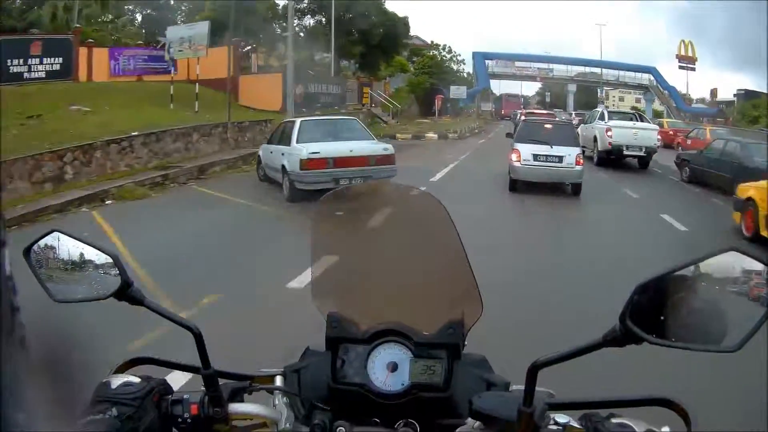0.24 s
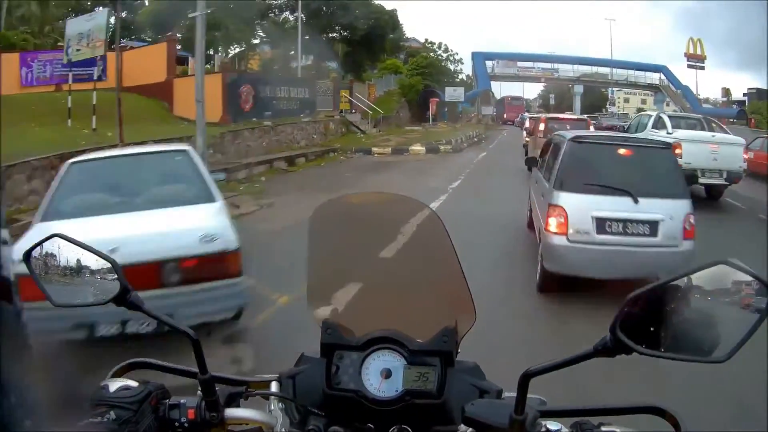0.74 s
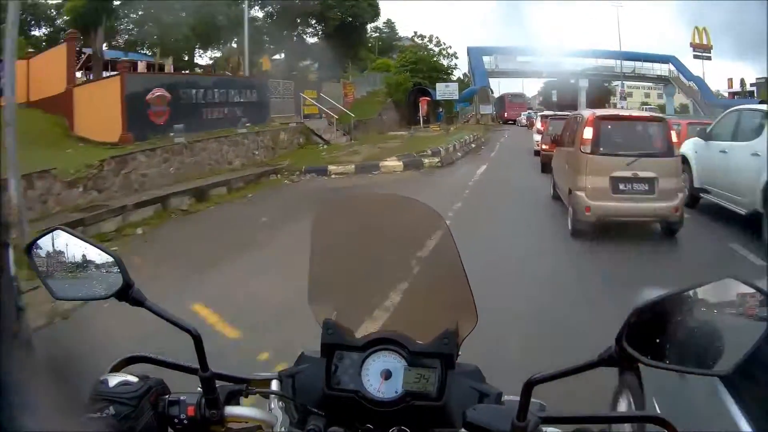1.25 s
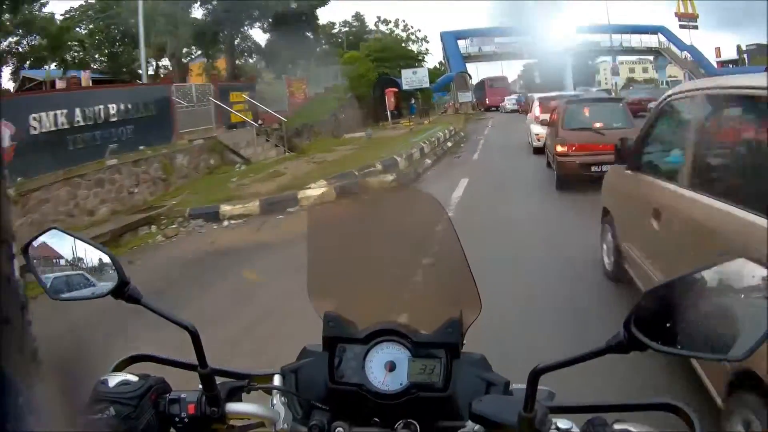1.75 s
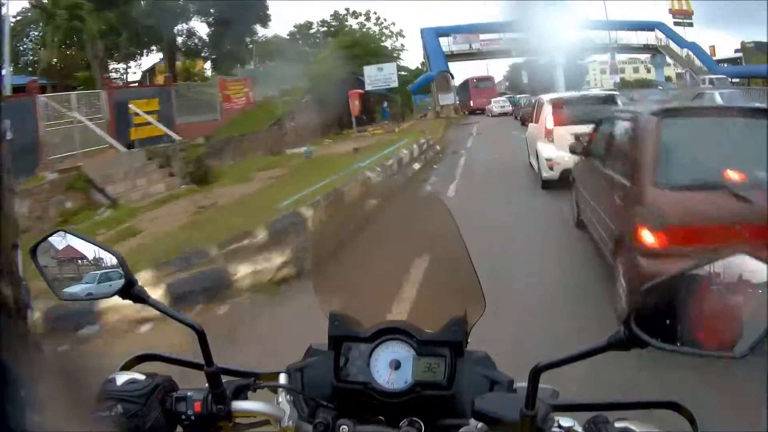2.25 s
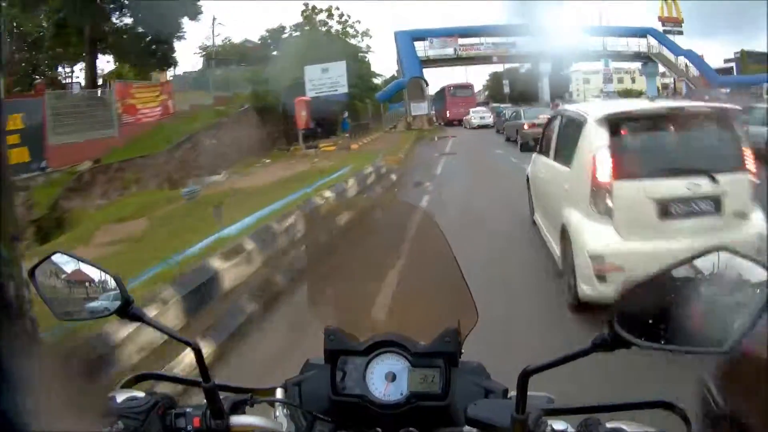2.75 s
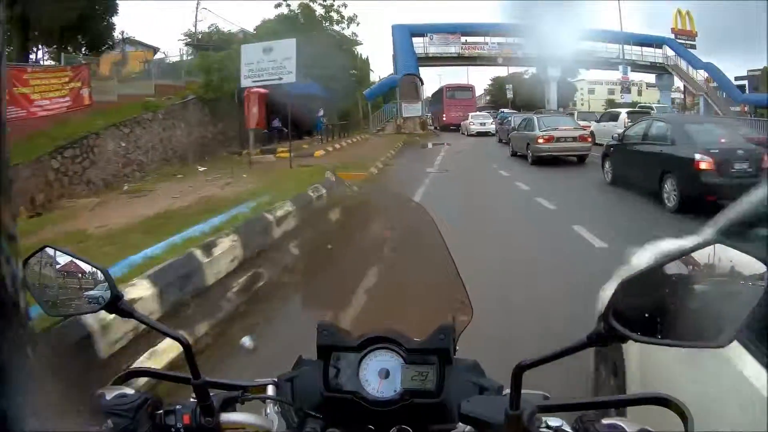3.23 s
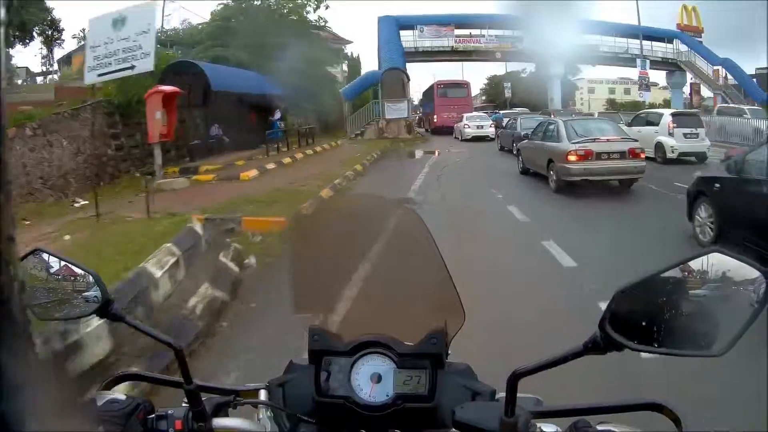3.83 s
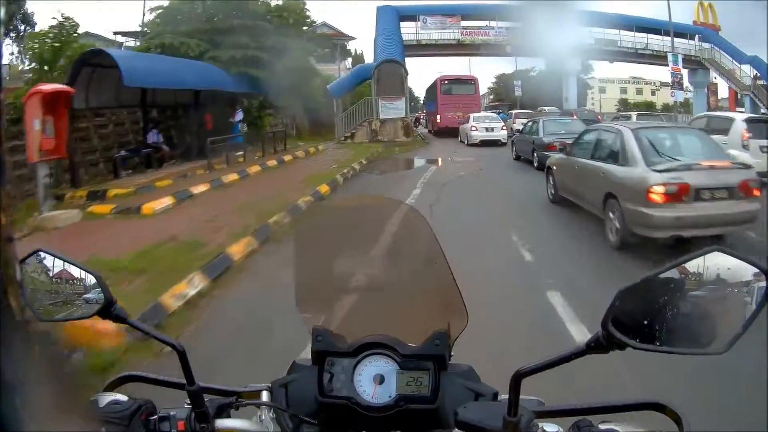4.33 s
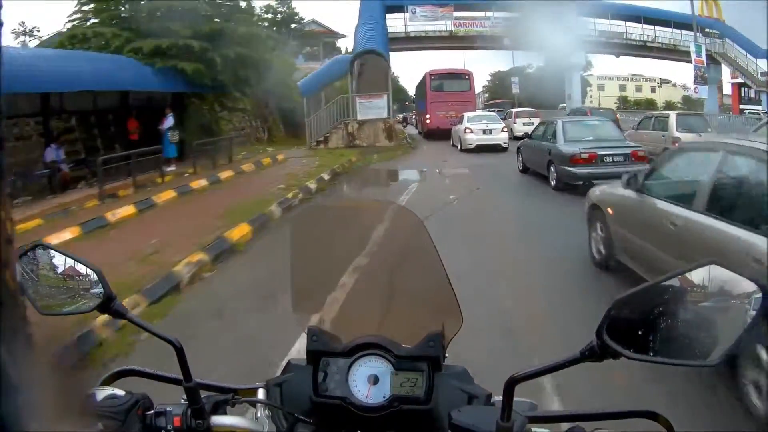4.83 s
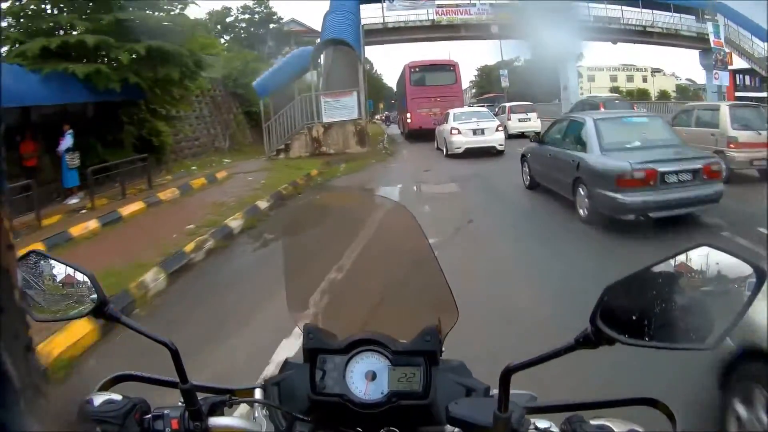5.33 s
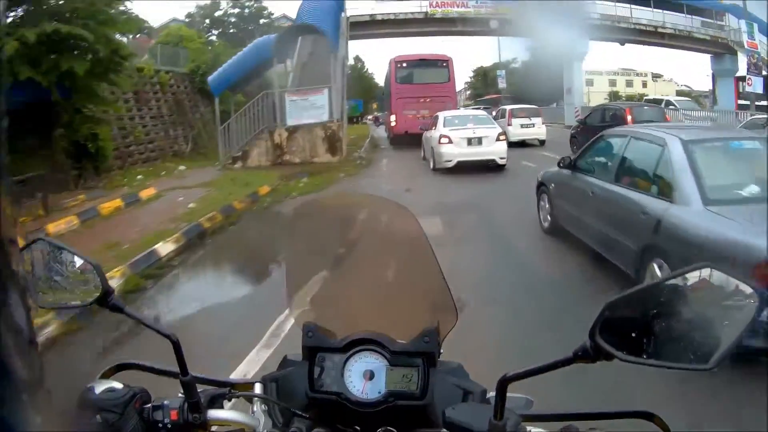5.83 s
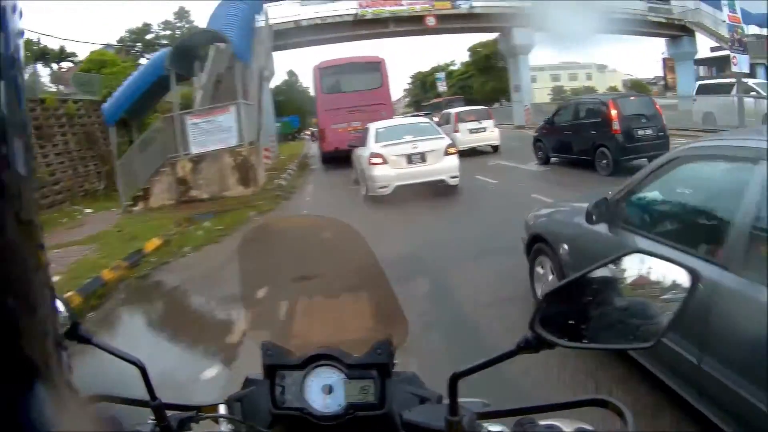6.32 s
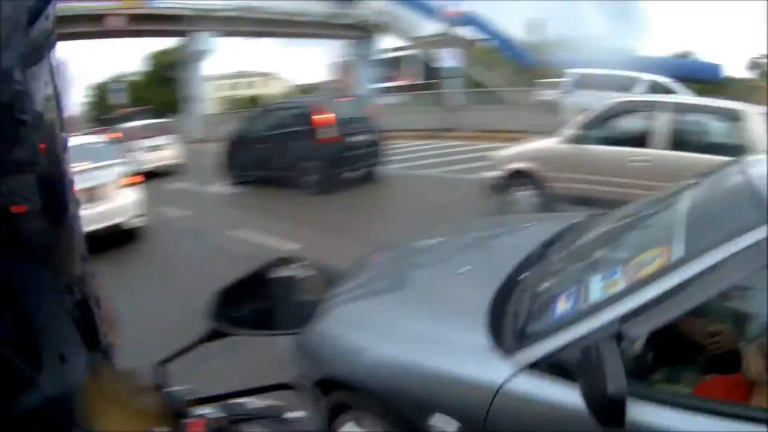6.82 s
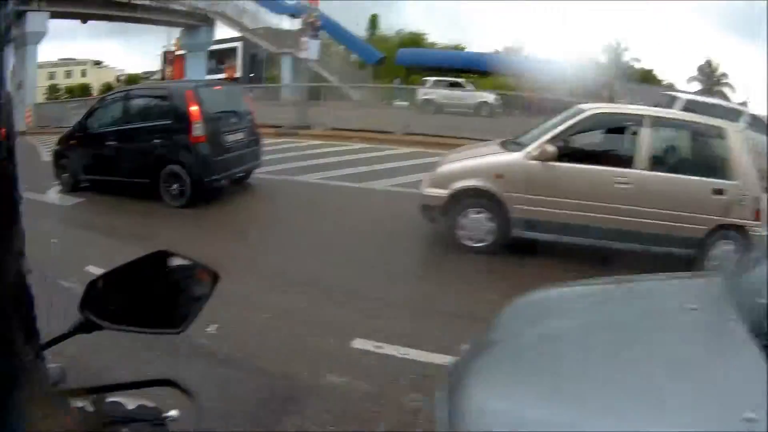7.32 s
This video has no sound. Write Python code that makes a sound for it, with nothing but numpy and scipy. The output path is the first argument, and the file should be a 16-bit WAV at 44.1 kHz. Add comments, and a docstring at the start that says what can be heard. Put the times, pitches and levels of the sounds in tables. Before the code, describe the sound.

A rider's microphone, enclosed in a small waterproof case, gives everything a hollow, boxy ring with muted treble. From 0 to about 1.7 s, strong low wind rumbles in irregular lumps with frequent gust slaps, over a twin-cylinder throb and hollow road roar. Sharp little drops tick on the case, clearest near 0.4, 0.9, 1.5 and 1.7 s. Wet tyre hiss swells briefly beside cars around 1.4, 2.1, 2.8 and 3.3 s. Wind eases; from 2.3 s a small engine nearby drones low and wavering, turning to a buzzing rasp with sharp pops at 4.4-4.9 s, then fading by 5.6 s. Another drop ticks at 5.2 s. The motorcycle's slow idle comes forward in paired thuds, stumbling weakly around 6-6.6 s. Light valve clatter rises near 6.6 s, small wet swishes pass, and dull knocks land at 6.95, 7.3 and 7.4 s.

```python
"""Motorcycle coasting on a wet road

A twin-cylinder motorcycle rolls beside queued cars and settles to a lumpy idle: paired pulses through a filter.
Wind, noise in irregular lumps, buffets the rider's camera and fades with speed; a small engine nearby drones
in low orders of its firing rate, then rasps in sharp pops. Grainy tyre hiss swells beside each car, damped
partials tick as drops hit the camera's waterproof case, and resonances give the air inside a hollow ring."""
import sys
import numpy as np
from scipy import signal
from scipy.fft import rfft, irfft, next_fast_len
from scipy.io import wavfile
from scipy.ndimage import uniform_filter1d, map_coordinates

SR = 44100
rng = np.random.default_rng(int(sys.argv[2]) if len(sys.argv) > 2 else 0)


def pcm_store(signal):
    """Save signal as 16-bit PCM."""
    levels = np.round(np.clip(np.atleast_2d(signal), -1, 1) * 32767)
    wavfile.write(sys.argv[1], SR, levels.astype(np.int16).T)


N = 333837
TIME = np.arange(N) / SR  # seconds

# Spectrum of the rushing wind. Each row: frequency in Hz, relative density in dB per Hz.
RUSH_SPECTRUM = [(40, -21), (100, -3), (150, 0), (240, 0.5), (350, -2), (480, -5.5), (700, -7.5),
                 (1000, -33.5), (2000, -41.5), (5000, -72.5)]
# Resonances of the air in the case. Each row: frequency in Hz, width in Hz, relative level in dB.
CASE_MODES = [(507, 34, 1.5), (577, 34, 4.5), (663, 53, 15), (730, 28, 2.5), (880, 50, -2)]


def amp(db):
    """Level: 20 dB is a factor of ten in amplitude."""
    return 10 ** (np.asarray(db) / 20)


def unit(x):
    """Normalisation: scale to an rms of 1."""
    return x / np.sqrt(np.mean(x ** 2) + 1e-20)


def curves(rows):
    """Linear interpolation: one value per sample for each column after the time."""
    s, *columns = np.transpose(rows)
    return [np.interp(TIME, s, column) for column in columns]


def wobble(rate):
    """Band-limited randomness: a smooth curve through random knots, rate of them a second."""
    return map_coordinates(rng.standard_normal(int(N * rate / SR) + 4), [TIME * rate])


def filtered(x, response):
    """Linear filtering: multiply the spectrum by a complex response of frequency."""
    size = 2 * next_fast_len(N // 2 + SR // 4)  # padded so that the tails do not wrap round
    spectrum = rfft(x, size)
    return irfft(spectrum * response(np.fft.rfftfreq(size, 1 / SR)), size)[:N]


def coloured(x, points):
    """Minimum phase: a folded cepstrum makes the outline in (Hz, dB) a causal filter."""
    f, db = np.transpose(points)

    def response(hz):
        outline_db = np.interp(np.log(hz + 1), np.log(f), db)
        cepstrum = irfft(np.log(amp(outline_db)))
        half = len(cepstrum) // 2
        cepstrum[1:half] *= 2
        cepstrum[half + 1:] = 0
        return np.exp(rfft(cepstrum))
    return filtered(x, response)


def noise(points):
    """Spectral shaping: white noise coloured by an outline, at rms 1."""
    return unit(coloured(rng.standard_normal(N), points))


def specks(rate, points):
    """Shot noise: coloured droplets of random size, on average rate a second, at rms 1."""
    landed = rng.random(N) < rate / SR
    return unit(coloured(rng.standard_normal(N) * landed, points))


def grainy(x, depth_db):
    """Time-frequency modulation: short narrow patches of random gain, at rms 1."""
    z = signal.stft(x, nperseg=512)[2]
    field = uniform_filter1d(rng.standard_normal(z.shape), size=4, axis=0)
    field = uniform_filter1d(field, size=4, axis=1)
    return unit(signal.istft(z * amp(depth_db * unit(field)), nperseg=512)[1][:N])


def impulses(times, sizes):
    """Impulsive excitation: single pushes at the given times."""
    inside = (times >= 0) & (times < (N - 1) / SR)
    return np.bincount(np.round(times[inside] * SR).astype(int), sizes[inside], N)


def passes(turns, offset):
    """Phase crossing: the times at which a shaft passes one point of its cycle."""
    return np.interp(np.arange(int(turns[-1]) + 1) + offset, turns, TIME, left=-1, right=-1)


def resonances(f, modes):
    """Modal superposition: complex response of a set of (Hz, width Hz, dB) modes."""
    return sum(amp(db) * 1j * f * w / (c * c - f * f + 1j * f * w) for c, w, db in modes)


def case_ring(x, modes):
    """Cavity resonance: modes heard through the shell, which shuts out the treble."""
    return filtered(x, lambda f: resonances(f, modes) / (1 + (f / 950) ** 6))


def taps(rows, t60, attack):
    """Impact on plastic: a few damped partials and a briefer gritty splash; t60 and attack in seconds."""
    track, t = np.zeros(N), np.arange(SR // 8) / SR
    partials = [(1, -3.5), (1.5, -25), (2.05, -18.5)]  # ratio to the pitch, dB
    for s, db, hz, grit in rows:
        ring = sum(amp(level) * np.sin(2 * np.pi * ratio * hz * t) for ratio, level in partials)
        splash = grit * rng.standard_normal(len(t)) * amp(-30 * t / t60)
        blow = (ring + splash) * amp(-60 * t / t60) * (1 - np.exp(-t / attack))
        add(track, s, amp(db) * blow / np.abs(blow).max())
    return track


def add(track, s, sound):
    """Superposition: mix a sound into the track at time s."""
    part = track[round(s * SR):][:len(sound)]
    part += sound[:len(part)]


def with_pace(start_db, doubling_db):
    """Power law of speed: gain of start_db at a speed share of 1, and doubling_db more per doubling."""
    # How fast the motorcycle rolls. Each row: time in seconds, share of its starting speed.
    pace_rows = [(0, 0.98), (1.7, 0.93), (2.4, 0.93), (3, 0.8), (4.2, 0.81), (5, 0.54), (6.2, 0.45),
                 (7.57, 0.37)]
    pace, = curves(pace_rows)
    return amp(start_db + doubling_db * np.log2(pace))


def wind(buffet_depth_db=2.0, rush_depth_db=2, flutter_db=-6.5, flutter_depth_db=4, gust_db=0.0):
    """Vortex shedding: eddies off the windscreen come in lumps of buffet and rush; panels ring by turns."""
    # Low buffet. Each row: frequency in Hz, relative density in dB per Hz.
    buffet_spectrum = [(10, -14.5), (25, -6.5), (50, 0.5), (80, -1.5), (140, -1.5), (220, -12), (400, -28),
                       (1000, -74)]
    # Panels that the air stream shakes. Each row: frequency in Hz, width in Hz, relative level in dB.
    panel_modes = [(623, 45, -1.5), (684.5, 47, 3.5), (736.5, 49, 2)]
    eddies = wobble(28)
    buffet = unit(noise(buffet_spectrum) * amp(buffet_depth_db * eddies + gust_db * wobble(7)))
    rush = unit(noise(RUSH_SPECTRUM) * amp(rush_depth_db * eddies + 3.1 * wobble(70)))
    flutter = unit(sum(case_ring(rng.standard_normal(N), [mode]) * amp(flutter_depth_db * wobble(13))
                       for mode in panel_modes))
    return with_pace(-30, 12.1) * buffet + with_pace(-31.5, 11.5) * (rush + amp(flutter_db) * flutter)


def slaps(body_db=-4):
    """Turbulent pressure pulses: the biggest eddies swing briefly, with a churn that rings the case."""
    # Gusts slap the case. Each row: time in seconds, swing envelope's peak in dB, pitch in Hz,
    # churn in dB over the swing.
    slap_rows = [(0.036, -13.5, 166, -14), (0.077, -17, 89, -13.5), (0.101, -20, 130, -7.5),
                 (0.234, -18.5, 116, -13), (.305, -17.5, 85, -25), (.383, -20, 106, -11),
                 (0.418, -24.5, 110, 0.5), (0.52, -25, 260, -19), (.641, -15, 100, -17.5),
                 (0.654, -18.5, 122, -16), (0.713, -16.5, 85, -10), (.8, -16, 261, -12),
                 (0.832, -23, 230, -6.5), (0.919, -22, 75, -13), (0.943, -21, 150, -25),
                 (.989, -19, 81, -25), (1.054, -21, 120, -27), (1.145, -19.5, 190, -15),
                 (1.228, -16, 123, -13.5), (1.358, -22.5, 70, -9.5), (1.452, -23.5, 83, -4.5),
                 (1.536, -16, 133, -15.5), (1.599, -22, 207, -8), (1.7, -16.5, 98, -7.5),
                 (1.927, -21.5, 110, -16), (2.22, -25, 89, -14), (3.209, -18, 133.5, -11.5)]
    swing_cycles, churn_s = 0.47, 0.01  # half lengths
    swings, churn = np.zeros(N), np.zeros(N)
    for s, db, hz, ring_db in slap_rows:
        near = np.abs(TIME - s) < .1
        t = TIME[near] - s
        swell = np.exp(-.5 * (t * hz / swing_cycles) ** 2)
        swings[near] += amp(db) * np.sin(2 * np.pi * (t * hz + rng.random())) * swell
        churn[near] += amp(db + ring_db) * np.exp(-(t / churn_s) ** 2)
    hollow = unit(case_ring(rng.standard_normal(N), CASE_MODES))
    return swings + churn * unit(hollow + amp(body_db) * noise(RUSH_SPECTRUM))


def twin(second_db=-2, intake_db=-7, scatter_db=1.0, breath_db=-17):
    """Pulsed exhaust: a gulp of air, then two firings about a quarter cycle apart and a rest: a double thud."""
    # The twin's speed. Each row: time in seconds, four-stroke cycles a second.
    speed_rows = [(0, 13.8), (.5, 14.4), (.95, 14.2), (1.2, 12.7), (1.8, 12.4), (2.1, 11.5), (2.6, 11.17),
                  (7.57, 11.19)]
    # Exhaust outline. Each row: frequency in Hz, relative density in dB per Hz.
    exhaust_spectrum = [(15, -29), (35, -0.5), (55, 0), (75, 4), (95, 4.5), (140, -8), (200, -11.5),
                        (320, -23.5), (700, -35.5), (1500, -76)]
    # Strength of the exhaust beats. Each row: time in seconds, level in dB before the burn varies it.
    throb_rows = [(0, -26.5), (1, -30.5), (2, -31), (2.5, -32), (3.2, -32.5), (3.9, -39), (4.6, -37.5),
                  (5.4, -31), (5.85, -30), (6.95, -28.5), (7.57, -30.5)]
    # Weak burns at idle. Each row: time in seconds, change in dB.
    stumble_rows = [(5.93, -4.5), (6.11, -11), (6.29, -9), (6.64, -10)]
    rate, = curves(speed_rows)
    turns = np.cumsum(rate) / SR + .19 + .015 * wobble(7)
    intake, first, second = -.29, 0, .235  # points of the cycle
    beats = np.zeros(N)
    # the intake pushes the other way from the firings
    for offset, push in [(intake, amp(intake_db)), (first, -1), (second, -amp(second_db))]:
        times = passes(turns, offset)
        chance = rng.standard_normal((len(times), 2))
        late = .0011 * chance[:, 0]  # seconds
        beats += impulses(times + late, push * amp(scatter_db * chance[:, 1]))
    one_beat = coloured(np.r_[1., np.zeros(N - 1)], exhaust_spectrum)
    thuds = coloured(beats, exhaust_spectrum) / np.abs(one_beat).max()
    gate = (.5 + .5 * np.cos(2 * np.pi * turns)) ** 2  # gas rushes out once a cycle, about the first firing
    # some cycles burn more strongly than others
    stumble_db = sum(db * np.exp(-((TIME - s) / .045) ** 4) for s, db in stumble_rows)
    burn_db = .7 * wobble(9) + stumble_db
    breath = amp(breath_db) * gate * noise(exhaust_spectrum)
    throb = amp(curves(throb_rows)[0] + burn_db) * (thuds + breath)
    return throb + clatter(turns)


def clatter(turns):
    """Resonance under repeated contact: the valve gear rattles once a cycle, just ahead of the thud."""
    # The twin's valve gear. Each row: frequency in Hz, width in Hz, relative level in dB.
    valve_modes = [(2280, 140, 0), (3100, 400, -12)]
    # Clatter's gain. Each row: time in seconds, level in dB.
    clatter_rows = [(0, -78), (5, -73), (6.4, -68), (6.56, -59), (6.75, -59.5), (7.05, -63), (7.3, -66),
                    (7.57, -70)]
    gate = (.5 + .5 * np.cos(2 * np.pi * (turns + .17 + .05 * wobble(11)))) ** 7
    contacts = gate * amp(wobble(25)) * rng.standard_normal(N)
    rattle = filtered(contacts, lambda f: resonances(f, valve_modes) / (1 + (f / 4000) ** 6))
    return amp(curves(clatter_rows)[0]) * unit(rattle)


def road(patter=0.17, mist=.34, hiss_grain_db=2, spray_grain_db=4.0):
    """Broadband tyre noise and reflection: a hollow roar; wet hiss and fine spray swell beside each car."""
    # Roar made hollow by the case, tyre hiss, hiss thrown back by a car, and fine spray.
    # Each row: frequency in Hz, relative density in dB per Hz.
    roar_spectrum = [(150, -29), (400, -7.5), (560, -3.5), (660, 0.1), (740, -3), (860, -8.5), (1000, -15),
                     (1250, -21.5), (1800, -32.5), (4000, -75)]
    hiss_spectrum = [(500, -10.5), (1100, -1), (1500, 3.5), (1900, -1.5), (2250, -0.5), (2650, -7),
                     (3000, -6), (3800, -13), (5000, -25.5), (6500, -47), (12000, -74)]
    thrown_spectrum = [(500, -13), (1100, -1.5), (1500, 0.5), (1900, 0.5), (2300, 3.5), (2650, -5),
                       (3000, -1.5), (3800, -14.5), (5000, -27), (6500, -44.5), (12000, -70.5)]
    spray_spectrum = [(2500, -11.5), (5000, -3), (6000, -4.5), (7800, 2), (9200, -5), (10000, -5.5),
                      (12000, -6.5), (13500, -3.5), (15500, -8)]
    # Queued cars going by. Each row: time in seconds, half length in seconds, hiss in dB, spray in dB.
    car_rows = [(1.36, 0.14, -56, -76), (1.598, 0.17, -61.5, -72.5), (2.08, 0.17, -54.5, -71.5),
                (2.79, 0.15, -54.5, -77.5), (3.33, 0.16, -53.5, -77.5), (4.1, 0.33, -61, -90),
                (5.35, 0.64, -58.5, -79.5), (6.5, 0.31, -59, -82.5)]
    roar = unit(noise(roar_spectrum) * amp(1.1 * wobble(60) + 0.51 * wobble(6.6)))
    # the film of water on the road comes and goes
    splash_db = 1.0 * wobble(20)
    flutter = amp(1.2 * wobble(90) + .5 * splash_db)
    hiss, thrown = [grainy((noise(colour) + patter * specks(60, colour)) * flutter, hiss_grain_db)
                    for colour in (hiss_spectrum, thrown_spectrum)]
    droplets = noise(spray_spectrum) + mist * specks(80, spray_spectrum)
    spray = grainy(droplets * amp(splash_db), spray_grain_db)
    spray *= amp(1.1 * wobble(14))
    thrown_gain, spray_gain = 0, with_pace(-75.5, 0.93)
    for s, half_s, hiss_db, spray_db in car_rows:
        beside = np.exp(-.5 * ((TIME - s) / half_s) ** 2)
        # powers add
        thrown_gain = np.hypot(thrown_gain, amp(hiss_db) * beside)
        spray_gain = np.hypot(spray_gain, amp(spray_db) * beside)
    rolling = with_pace(-38, 1.8) * roar + with_pace(-56, 1.8) * hiss
    return rolling + thrown_gain * thrown + spray_gain * spray


def drops():
    """Impact excitation: each drop ticks on the shell and rings the wall, more or less by where it lands."""
    # Drops hit the case. Each row: time in seconds, tick's peak in dB before the shell colours it,
    # pitch in Hz, splash share, wall ring's peak in dB.
    drop_rows = [(.396, -38, 3450, 0.05, -35), (0.398, -46, 8240, .05, -39.5), (0.8672, -34, 6500, 2, -44),
                 (0.8671, -28.5, 4130, 0.71, -35.5), (.868, -35.5, 1280, .1, -45),
                 (.87, -43.5, 3300, 1, -41.5), (1.241, -36, 3450, 0.48, -41), (1.243, -40, 7400, 1.2, -41),
                 (1.283, -47, 2900, .2, -43), (1.305, -40, 3330, .6, -52), (1.504, -31.5, 1340, 0.14, -44),
                 (1.727, -30.5, 2320, 0.23, -42), (1.728, -46, 7820, .4, -50), (1.881, -41, 3550, 0.3, -40),
                 (5.204, -35, 6760, 0.34, -50.5), (5.205, -40.5, 4020, 0.63, -50)]
    # How the case colours a drop. Each row: frequency in Hz, gain in dB.
    shell_outline = [(1200, 5.5), (2400, 0), (3900, -0.5), (5100, 0.5), (7000, -2.5), (9500, -4),
                     (14000, -12.5)]
    # The stiff wall under a drop. Each row: frequency in Hz, width in Hz, relative level in dB.
    wall_modes = [(1960, 230, 10), (2380, 220, -5), (3540, 290, -3)]
    ticks = coloured(taps([row[:4] for row in drop_rows], t60=0.0039, attack=0.00016), shell_outline)
    s, *_, wall_db = np.transpose(drop_rows)

    def wall(x):
        return filtered(x, lambda f: resonances(f, wall_modes))
    one_ring = wall(np.r_[1., np.zeros(N - 1)])
    return ticks + wall(impulses(s, amp(wall_db))) / np.abs(one_ring).max()


def neighbour(rough_db=1.7, jitter=.00004, fourth_db=-8.5):
    """Harmonic orders of the firing rate: a small engine's wavering drone, and sharp pops that ring the case."""
    # Revs. Each row: time in seconds, firings a second.
    rev_rows = [(1.7, 78), (2.1, 79.2), (2.35, 82), (2.65, 83.3), (2.9, 81.9), (3.2, 80.2), (3.55, 81.8),
                (3.85, 80.3), (4.1, 80.6), (4.3, 81.2), (4.55, 82.8), (4.8, 83.4), (5, 84.4), (5.6, 83.6)]
    # Drone, shifting between orders as it passes the cars. Each row: time in seconds,
    # mean levels of the first, second and third order in dB.
    drone_rows = [(1, -56, -66, -60), (2.25, -40, -43.5, -44.5), (2.36, -37, -30, -38.5),
                  (2.48, -34.5, -41, -46), (2.64, -29, -32, -43), (2.78, -33.5, -40, -52),
                  (2.89, -28.5, -30, -41.5), (3.1, -32.5, -36.5, -48), (3.22, -29.5, -36.5, -48),
                  (3.35, -33, -45, -42.5), (3.5, -32.5, -41, -47), (3.64, -46, -47, -57),
                  (3.74, -51, -31, -37.5), (3.85, -36, -42, -37), (3.97, -35, -35, -35),
                  (4.08, -38, -45, -39), (4.18, -38, -47, -46), (4.28, -43, -42, -33.5),
                  (4.42, -47, -39, -47), (4.53, -37.5, -38, -46), (4.63, -32.5, -43, -46.5),
                  (4.73, -45, -37.5, -38), (4.9, -44, -46, -48.5), (5.15, -50, -41.5, -52.5),
                  (5.6, -56, -63, -65), (7.57, -84, -87, -87)]
    # Pops ringing the case. Each row: time in seconds, gain in dB of the two lower resonances,
    # gain in dB of the upper ones.
    rasp_rows = [(1, -66, -66), (2.2, -53, -54.5), (3.7, -54, -54), (4, -42.5, -41), (4.3, -42, -42),
                 (4.6, -41, -33.5), (4.77, -40.5, -38), (4.88, -45.5, -45.5), (5.03, -39.5, -51),
                 (5.2, -50, -46), (5.6, -57, -52), (7.57, -81, -69)]
    # Hardest firings. Each row: time in seconds, dB over the others.
    hard_rows = [(4.455, 6.5), (4.552, 3), (4.587, 3), (4.6, 1), (4.635, 0.5), (4.707, 3.5), (4.755, 6),
                 (4.768, 3), (4.816, 7)]
    rate, = curves(rev_rows)
    first_db, second_db, third_db = curves(drone_rows)
    turns = np.cumsum(rate * (1 + .001 * wobble(12))) / SR
    # shifting reflections off the cars bend each low order a little, in cycles
    bend, waver_db = .03, .8
    drone = 0
    for order, db in enumerate([first_db, second_db, third_db, third_db + fourth_db], start=1):
        level = amp(db + waver_db * wobble(16)) * np.sqrt(2)
        cycles = order * turns + rng.random() + bend * wobble(11)
        drone = drone + level * np.sin(2 * np.pi * cycles)
    times = passes(turns, .42)
    chance = rng.standard_normal((len(times), 2))
    # each hard firing is the one nearest the listed time
    hard_db = sum(db * (np.arange(len(times)) == np.abs(times - s).argmin()) for s, db in hard_rows)
    pops = impulses(times + jitter * chance[:, 0], amp(rough_db * chance[:, 1] + hard_db))
    lower_db, upper_db = curves(rasp_rows)
    lower = amp(lower_db) * unit(case_ring(pops, CASE_MODES[:2]))
    upper = amp(upper_db) * unit(case_ring(pops, CASE_MODES[2:]))
    return drone + lower + upper


def swishes():
    """Gated turbulence noise: brief spurts of water on the road."""
    # Short wet swishes. Each row: time in seconds, half length in seconds, level in dB at the middle.
    swish_rows = [(1.44, 0.018, -54), (2.115, 0.015, -53.5), (3.4, 0.0076, -55), (3.682, .015, -56.5),
                  (5.027, .02, -53.5), (6.463, 0.014, -55), (6.954, 0.0096, -56), (7.436, 0.0086, -55)]
    # Swish spectrum. Each row: frequency in Hz, relative density in dB per Hz.
    swish_spectrum = [(1200, 0), (2300, 3.5), (2900, -4.5), (3500, -5), (4600, -16), (5600, -23),
                      (6600, -24.5), (7900, -16.5), (10000, -30.5), (15000, -33.5)]
    gain = sum(amp(db) * np.exp(-.5 * ((TIME - s) / half_s) ** 2) for s, half_s, db in swish_rows)
    return gain * noise(swish_spectrum)


def knocks():
    """Damped impact under a low-pass: the mount knocks dully as the rider's head turns."""
    # Knocks. Each row: time in seconds, peak in dB before the low-pass, pitch in Hz, grit share.
    knock_rows = [(6.949, -24, 540, 2), (7.283, -22, 720, 3.1), (7.294, -17, 653, 2.3),
                  (7.381, -24.5, 296, 0.65), (7.39, -18, 684, 1.7)]
    return filtered(taps(knock_rows, t60=0.058, attack=0.001), lambda hz: 2.0 / (1 + (hz / 900) ** 6))


def scene():
    """Superposition: the sum of everything that reaches the camera."""
    air = wind() + slaps()
    engines = twin() + neighbour()
    water = road() + drops() + swishes()
    return (air + engines + water + knocks())[None]


def record(dry):
    """Band limiting: the camera keeps nothing from 15460 Hz up."""
    return filtered(dry[0], lambda hz: hz < 15460)[None]


dry = scene()
out = record(dry)
pcm_store(out)
```